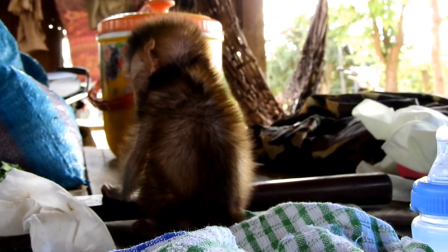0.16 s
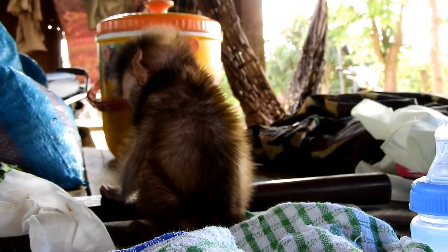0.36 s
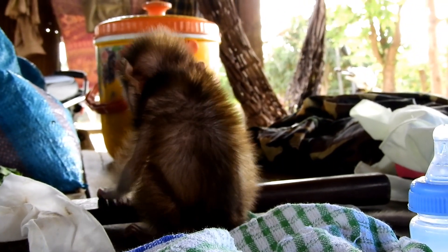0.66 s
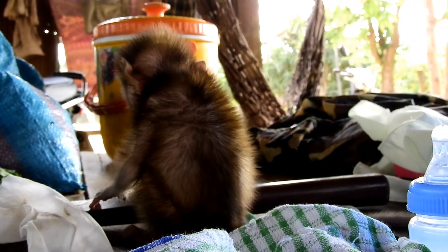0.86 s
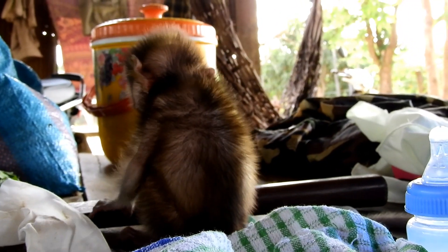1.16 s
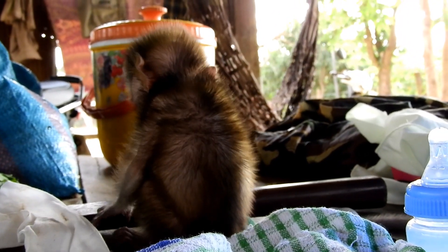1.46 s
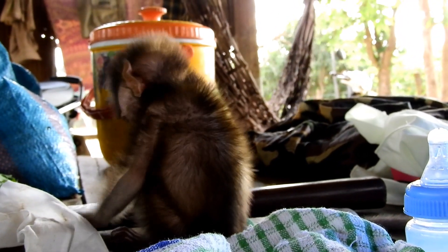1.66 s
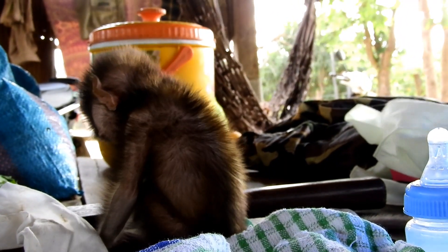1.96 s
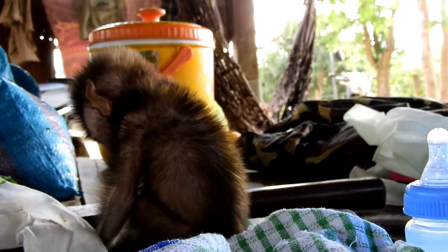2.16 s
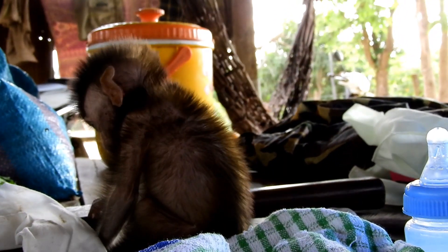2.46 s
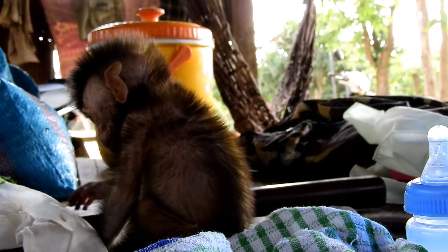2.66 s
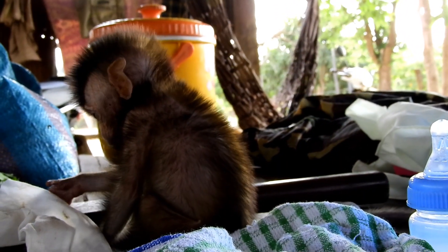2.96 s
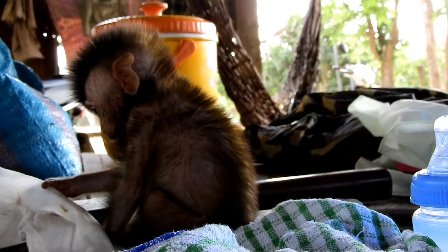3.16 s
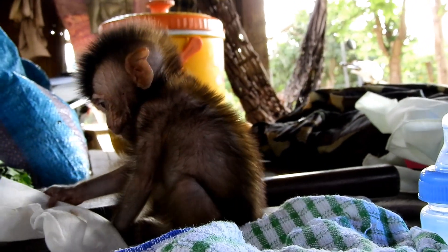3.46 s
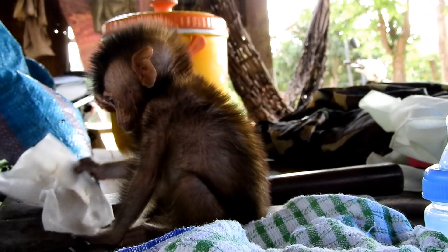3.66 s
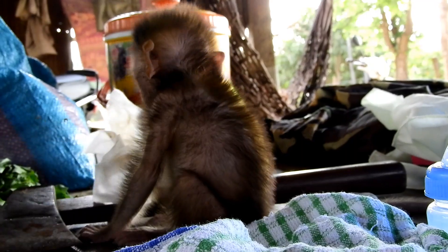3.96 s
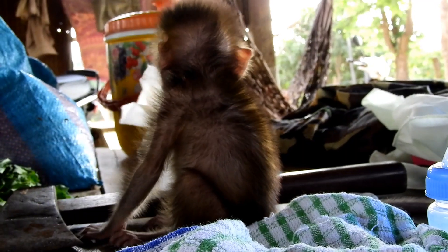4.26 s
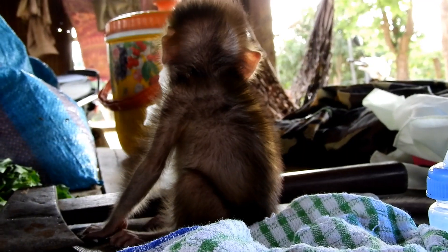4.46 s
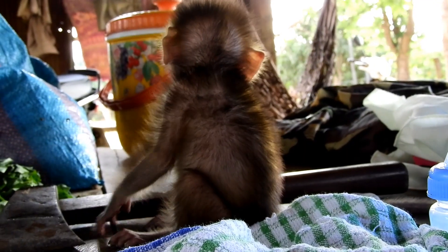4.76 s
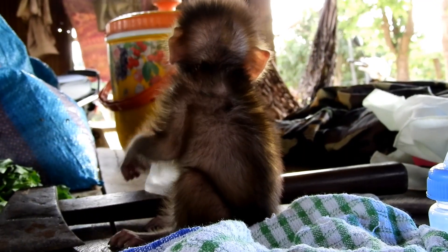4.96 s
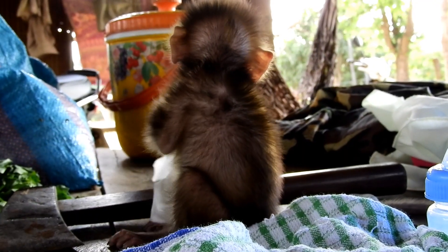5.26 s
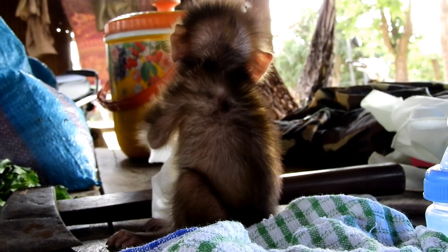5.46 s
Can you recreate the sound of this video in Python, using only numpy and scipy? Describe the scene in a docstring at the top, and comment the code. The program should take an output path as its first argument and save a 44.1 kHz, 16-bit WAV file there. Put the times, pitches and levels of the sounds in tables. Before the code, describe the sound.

In an open village shelter, many chicks give short, high, falling peeps over a low throbbing small engine and soft hiss. A young monkey rustles bags and cloth, scrapes and bumps boards, busiest near four seconds. A hen clucks once midway. The scene is only in the right channel; the left holds faint flickering hiss.

```python
"""Open shelter by a yard: a young monkey shuffles on cloth and plastic bags, rubbing, bumping and scraping.
Chicks peep as gliding near-sines, a hen clucks once and something coos far off, both as pulses through
resonances. A small engine throbs as tones locked to its firing, over air hiss made of coloured noise.
Only the right microphone port hears the scene; the left carries its own faint flickering hiss."""
import sys
import numpy as np
from scipy import signal
from scipy.fft import rfft, irfft
from scipy.io import wavfile
from scipy.ndimage import uniform_filter1d

SR = 44100
rng = np.random.default_rng(int(sys.argv[2]) if len(sys.argv) > 2 else 0)


def master(y):
    """Save y as 16-bit WAV."""
    cut = np.clip(np.atleast_2d(y).T, -1, 1)
    pcm = np.round(cut * 32767)  # scale
    wavfile.write(sys.argv[1], SR, pcm.astype(np.int16))


def how_loud(loudness_db):
    """Turn decibels into a plain amplitude multiplier (0 dB gives 1, 20 dB gives 10)."""
    steps = np.asarray(loudness_db, float) / 20
    return 10 ** steps


N = 246959

# Scene levels are ahead of the right channel gain; spectra give shape only.
# Left port self-noise: (frequency [Hz], relative density [dB/Hz])
LEFT_HISS_SPECTRUM = [(30, -7), (100, -5.5), (150, 3.5), (200, 5), (300, -2), (1000, -4.5), (2500, -11.5),
                      (4500, -6.5), (8000, -12), (12000, -16), (14400, -19)]
# Air spectrum: (frequency [Hz], relative density [dB/Hz])
AIR_SPECTRUM = [(25, -28.5), (63, -19.5), (111, -22), (150, 2.5), (221, -7), (273, -15), (560, -21),
                (2480, -27), (3890, -26.5), (4450, -23.5), (5960, -24.5), (9120, -23), (11900, -37.5)]
# Air level: (time [s], level [dB])
AIR_LEVEL_DB = [(0, -48), (1.5, -48), (3.5, -49.5), (5.6, -53)]
# Engine tones: (multiple of firing rate [1], relative level [dB])
ENGINE_ORDERS = [(5, -8), (6, 3.5), (7, -3), (8, -17), (9, -7), (10, -5.5)]
# Engine level: (time [s], level [dB])
ENGINE_LEVEL_DB = [(0, -48), (1.6, -46.5), (2.4, -47.5), (3, -52.5), (3.6, -49), (5.5, -51.5)]
# Far coo: (time [s], pitch [Hz], level [dB])
COO_TRACK = [(3.14, 255, -63), (3.2, 247, -61.5), (3.52, 258.6, -54.5), (3.58, 250, -54.5),
             (3.63, 247, -69)]
# Coo throat resonances: (frequency [Hz], width per pass [Hz], relative level [dB])
COO_RESONANCES = [(260, 150, -5), (505, 120, 0)]
# Hen cluck: (time [s], pitch [Hz], level [dB], beak opening factor on resonances [1])
CLUCK_TRACK = [(3.232, 196, -66, .93), (3.25, 200, -52, .93), (3.295, 213, -44.5, .99),
               (3.32, 212, -44, 1.11), (3.372, 220, -60, 1.14)]
# Hen resonances at opening 1: (frequency [Hz], width per pass [Hz], relative level [dB])
BEAK_RESONANCES = [(430, 150, -6), (880, 220, 0), (1130, 200, -5)]
# Short peeps: (start [s], length [s], start pitch [Hz], end pitch [Hz], level before reach [dB])
PEEP_GLIDES = [(.16, .09, 4990, 3300, -57), (.278, .045, 4650, 4100, -59), (.36, .042, 5050, 4100, -56),
               (.477, .045, 4650, 4400, -57), (.535, .143, 5000, 3100, -54), (.715, .055, 4650, 4150, -59),
               (.813, .09, 5350, 4400, -55), (.925, .08, 4480, 5300, -48), (1.17, .03, 3950, 3870, -52),
               (1.53, .13, 4500, 3300, -58), (1.93, .035, 4500, 3950, -53), (2.035, .07, 4650, 4350, -56),
               (2.16, .05, 4300, 3500, -60), (1.135, .04, 4500, 4380, -55), (2.7, .09, 4400, 3300, -60),
               (2.83, .025, 5000, 5400, -55), (2.9, .08, 4750, 5750, -52), (2.974, .036, 3700, 3400, -56),
               (3.069, .09, 4600, 3500, -58), (3.968, .04, 5400, 5100, -55), (4.13, .016, 4100, 5000, -55),
               (4.303, .058, 4800, 3350, -55), (4.47, .072, 4950, 3400, -54), (4.5, .05, 5100, 4250, -52),
               (4.66, .09, 4700, 3850, -58), (4.944, .106, 5580, 3400, -56), (5.13, .1, 5050, 3550, -60),
               (5.16, .05, 4950, 4400, -57), (5.34, .06, 4500, 3500, -60)]
# Cries held near their first pitch, then gliding evenly, mostly down:
# (start [s], length [s], first pitch [Hz], end pitch [Hz], level before reach [dB])
CRY_GLIDES = [(0, .13, 5700, 3400, -60), (.29, .14, 5650, 3700, -58), (1.325, .155, 5800, 4200, -55),
              (1.685, .15, 5750, 4100, -58), (2.14, .07, 5680, 5800, -59), (2.222, .06, 4800, 4250, -54),
              (3.487, .048, 4520, 4200, -55), (3.62, .048, 4930, 4250, -55), (2.612, .185, 5730, 4100, -57),
              (3.63, .07, 5780, 5100, -60), (4.137, .068, 5030, 4250, -52), (4.856, .105, 5560, 4050, -58),
              (5.36, .06, 5480, 4550, -54)]
# Tweets arching up and down: (start [s], top pitch [Hz], level before reach [dB])
TWEET_ARCHES = [(.996, 5590, -46.5), (4.43, 6800, -57), (4.776, 6760, -57), (4.96, 6510, -54),
                (5.116, 6820, -56.5)]
# How well each pitch carries: (pitch [Hz], gain [dB])
REACH_GAIN = [(3000, -6), (3500, -1), (3900, -5), (4350, 1), (4900, 0), (5250, -4), (5700, -2), (7000, -2)]
# Nails scraping a hard edge: (loudest [s], length [s], resonance [Hz], width per pass [Hz], level [dB])
NAIL_SCRAPES = [(1.947, 0.12, 2090, 692, -48), (3.874, 0.074, 1750, 298, -50.5)]
# Hands and feet bumping boards: (time [s], blow level [dB], drag decay [s], pitch factor of spot [1])
BOARD_BUMPS = [(0.674, -42.5, 0.017, 1.3), (0.718, -42.5, 0.028, 1.35), (1.929, -48.5, 0.13, 1.54),
               (3.725, -42.5, 0.05, 0.57), (3.839, -39.5, 0.066, 0.8), (3.971, -50, 0.015, 1.1),
               (4.742, -44.5, 0.042, 1.05)]
# Board modes at pitch factor 1: (frequency [Hz], relative level [dB], t60 [s])
BOARD_MODES = [(190, -3, .06), (300, -1, .07), (370, -2, .07), (450, 0, .08), (545, -3, .07),
               (700, -8, .06)]
# Constant fidgeting under the strokes: (time [s], crisp rustle level [dB])
FIDGET_LEVEL_DB = [(0, -54.5), (.8, -57), (1.5, -58.5), (2.4, -54.5), (3.5, -57.5), (4.1, -58), (5.5, -60)]
# Strokes of fur, cloth and bags: (loudest [s], length [s], crisp level [dB], dull drag re crisp [dB])
RUB_STROKES = [(0.388, 0.062, -50.5, -5.5), (0.742, 0.051, -50.5, 0), (.908, .03, -43, -22),
               (0.986, 0.13, -45, -13), (1.154, 0.25, -47.5, -10.5), (1.561, 0.026, -52, -5.5),
               (1.71, 0.091, -51, -9.5), (1.819, 0.11, -45.5, -12.5), (1.944, 0.083, -49.5, 1.5),
               (2.054, 0.019, -48, -17), (2.783, 0.18, -50, -7), (3.095, 0.19, -50, -9),
               (3.215, 0.14, -51, -7.5), (3.328, 0.085, -49.5, -6.5), (3.549, 0.085, -50.5, -7),
               (3.746, 0.14, -48.5, -14), (3.861, 0.086, -43, -5), (3.902, 0.039, -42, -3.5),
               (3.948, 0.052, -57, 9), (4.771, 0.081, -50, -6)]
# Bright rustle spectrum: (frequency [Hz], relative level [dB])
CRISP_SPECTRUM = [(4500, -14.5), (6500, -9), (8900, 2), (10500, -10), (12200, -15)]
# Middle of the rustle: (frequency [Hz], relative level [dB])
SWISH_SPECTRUM = [(2000, -11.5), (2600, -4.5), (4500, -0.5), (6500, -5), (8500, -47.5)]
# Dull drag spectrum: (frequency [Hz], relative level [dB])
DULL_SPECTRUM = [(200, -44), (400, -8), (1200, 4), (2300, 0.5), (3000, -20.5), (5000, -70.5)]

LEFT_HISS_DB, RIGHT_GAIN_DB = -57, 6.5
RIGHT_BAND_HZ = 28, 12350  # steep edges
FADE_S = 5.462, 5.492  # fade start, end
FIRING_HZ = 22.05
CROWD_DB, CROWD_SPREAD_DB = -73, 6.5  # faint chicks farther off
# Glide exponents: falls (length / STRAIGHT_S) ** LINGER, so longer ones stay on top; rises steepen by RISE_BEND
STRAIGHT_S, LINGER, RISE_BEND = .05, .62, 2.7
CRY_HOLD_S, RISE_GROW_DB = .028, 15  # time on first pitch; growth over a rise of more than 5 %
TWEET_S, ARCH = .05, .04  # length; share of pitch that the ends lie under the top
TREMBLE = .008  # rms share of pitch
NEAR_ECHO_DB, NEAR_ECHO_T60_S = -7, .04  # posts and walls close to the chicks
FAR_ECHO_DB, FAR_ECHO_T60_S = -4.5, .25
ROUGHEN_HZ = 250  # fast random level changes roughen the far echoes
RISE_SHARE, EDGE_DB = .3, -11  # rise time re stroke length; level one rise before or one length after the peak
FIDGET_DULL_DB = -10  # dull drag re crisp
SWISH_DB, SWISH_SHARE = -5, .4  # swish gain; share of the dull drag's dB that it follows


def evened(x):
    """Scales to rms 1."""
    return x / np.sqrt(np.mean(x ** 2) + 1e-20)


def curve(rows):
    """Interpolates the columns of a time table, one value a sample."""
    s, *columns = np.transpose(rows)
    return [np.interp(np.arange(N) / SR, s, column) for column in columns]


def wander(hz):
    """Random signal of rms 1, rolled off above hz."""
    spectrum = rfft(rng.standard_normal(N))
    rolloff = 1 + (np.fft.rfftfreq(N, 1 / SR) / hz) ** 4
    return evened(irfft(spectrum / rolloff, N))


def colour(x, points):
    """Filters x by a spectrum on a log-frequency axis, to rms 1."""
    f, db = np.transpose(points)
    hz = np.fft.rfftfreq(N, 1 / SR)
    gain = how_loud(np.interp(np.log(hz + 1), np.log(f + 1), db))
    return evened(irfft(rfft(x) * gain, N))


def resonate(x, hz, width_hz):
    """Movable resonance of gain 1: shift down, smooth, shift back."""
    turn = np.exp(2j * np.pi * np.cumsum(hz * np.ones(len(x))) / SR)
    r = np.exp(-np.pi * width_hz / SR)
    return 2 * (turn * signal.lfilter([1 - r], [1, -r], x / turn)).real


def crackle(per_s, spread_db, smooth):
    """Dense tiny snaps of uneven size, blended with smooth noise."""
    happens = rng.random(N) < per_s / SR
    size = how_loud(spread_db * np.minimum(rng.exponential(1, N), 4)) * happens
    return smooth * rng.standard_normal(N) + evened(size * rng.standard_normal(N))


def patchy(x, patchy_db):
    """Uneven gain in patches some hundred hertz wide and tens of milliseconds long."""
    z = signal.stft(x, nperseg=512, noverlap=384)[2]
    field = rng.standard_normal(z.shape[::-1]).T
    field = uniform_filter1d(field, size=2, axis=0)  # frequency
    field = uniform_filter1d(field, size=12, axis=1)  # time
    return signal.istft(z * how_loud(patchy_db * evened(field)), nperseg=512, noverlap=384)[1][:N]


def yard(x, wet_db, t60_s=0.014, gap_s=0.011):
    """Direct sound plus a decaying cloud of sparse reflections."""
    t = np.arange(SR // 2) / SR
    signs = rng.choice([-1., 1.], len(t))
    present = (rng.random(len(t)) < .05) * (t > gap_s)
    taps = signs * present * how_loud(-60 * t / t60_s)
    return x + how_loud(wet_db) * signal.oaconvolve(x, taps / np.linalg.norm(taps))[:N]


def left_hiss():
    """Left port self-noise: coloured noise with a flickering, patchy level."""
    hiss = how_loud(LEFT_HISS_DB + 1.6 * wander(23)) * colour(rng.standard_normal(N), LEFT_HISS_SPECTRUM)
    return patchy(hiss, patchy_db=5.0)


def air():
    """Hiss of the surroundings: coloured noise, breathing slightly."""
    level_db = curve(AIR_LEVEL_DB)[0] + 0.21 * wander(26.3)
    return how_loud(level_db) * colour(rng.standard_normal(N), AIR_SPECTRUM)


def engine():
    """Multiples of the firing rate nearly aligned at each firing, so the hum throbs."""
    turns = np.cumsum(FIRING_HZ * (1 + 0.00427 * wander(4.83))) / SR + .86
    tones = np.zeros(N)
    for k, db in ENGINE_ORDERS:
        drift_rad = .22 * wander(3)
        phase = 2 * np.pi * k * turns + drift_rad + 0.059 * k * k
        tones += how_loud(db + 1.2 * wander(1.4)) * np.cos(phase)
    return how_loud(curve(ENGINE_LEVEL_DB)[0]) * evened(tones)


def voice(rows, throat, rough):
    """Jittered pulses and puffs of breath through throat resonances."""
    hz, level_db, *opening = curve(rows)
    opening = opening[0] if opening else 1
    level_db = level_db + 2.5 * wander(25)  # the voice breaks up
    turns = np.cumsum(hz * (1 + 0.014 * wander(99))) / SR
    folds = sum(np.cos(2 * np.pi * k * turns) for k in range(1, 6))
    breath = np.exp(-(turns % 1) / 0.3) * rng.standard_normal(N)
    drive = evened(folds) + rough * breath
    sound = np.zeros(N)
    for hz_rest, width_hz, db in throat:
        f = hz_rest * opening
        sound += how_loud(db) * resonate(resonate(drive, f, width_hz), f, width_hz)
    t = np.arange(N) / SR
    sounding = (t > rows[0][0]) * (t < rows[-1][0])
    return yard(how_loud(level_db) * sounding * evened(sound), wet_db=-5)


def coo():
    """Far coo: voiced pulses with less breath than the cluck, through two resonances."""
    return voice(COO_TRACK, COO_RESONANCES, rough=1.2)


def cluck():
    """Hen cluck: breathy pulses; the opening beak lifts the resonances."""
    return voice(CLUCK_TRACK, BEAK_RESONANCES, rough=6)


def chick_calls():
    """Pitch glides (start [s], pitch track [Hz], level [dB]); a faint crowd falls in at random."""
    def unit(length_s):
        return np.linspace(0, 1, round(length_s * SR))

    crowd = [(5.4 * a, .04 + .06 * b, 4100 + 1300 * c, 3400 + 1300 * c, CROWD_DB + CROWD_SPREAD_DB * d)
             for a, b, c, d in rng.random((220, 4))]
    calls = []
    for s, length, start, end, db in PEEP_GLIDES + crowd:
        bend = RISE_BEND if end > start else (length / STRAIGHT_S) ** LINGER
        calls.append((s, start + (end - start) * unit(length) ** bend, db))
    for s, length, first, end, db in CRY_GLIDES:
        calls.append((s, np.interp(length * unit(length), [CRY_HOLD_S, length], [first, end]), db))
    for s, top, db in TWEET_ARCHES:
        calls.append((s, top * (1 - ARCH * (2 * unit(TWEET_S) - 1) ** 2), db))
    return calls


def peeps():
    """Near-sine glides with trembling pitch and fluttering level, plus near and far echoes."""
    out = np.zeros(N + SR)
    flutter, tremble = np.tile(wander(120), 2), np.tile(wander(170), 2)
    for s, hz, db in chick_calls():
        at, count = round(s * SR), len(hz)
        glide_hz = hz * (1 + TREMBLE * tremble[at:at + count])
        rises = hz[-1] > 1.05 * hz[0]
        grow_db = RISE_GROW_DB * np.linspace(-.5, .5, count) * rises
        reach_db = np.interp(hz, *np.transpose(REACH_GAIN))
        level_db = db + grow_db + reach_db + 3.2 * flutter[at:at + count]
        tone = np.sqrt(2) * np.sin(2 * np.pi * np.cumsum(glide_hz) / SR)
        out[at:at + count] += signal.windows.tukey(count, .25) * how_loud(level_db) * tone
    near = yard(out[:N], NEAR_ECHO_DB, NEAR_ECHO_T60_S, gap_s=.002)
    far = yard(near, FAR_ECHO_DB, FAR_ECHO_T60_S, gap_s=.015) - near
    return near + far * wander(ROUGHEN_HZ)


def scrapes():
    """Nails on a hard edge: swelling noise rings one broad resonance."""
    t, out = np.arange(N) / SR, np.zeros(N)
    for s, length, hz, width_hz, db in NAIL_SCRAPES:
        swell = np.cos(np.pi * np.clip((t - s) / length, -.5, .5))
        noise = crackle(1500, 1.9, 0.77)
        out += how_loud(db) * swell * evened(resonate(resonate(noise, hz, width_hz), hz, width_hz))
    return out


def bumps():
    """A blow and short drag of noise ring board modes; stiffer spots ring higher and shorter."""
    t, ring_t, out = np.arange(SR // 2) / SR, np.arange(SR // 4) / SR, np.zeros(N + SR)
    for s, blow_db, drag_s, spot in BOARD_BUMPS:
        modes = np.zeros(len(ring_t))
        for hz, db, t60_s in BOARD_MODES:
            decay = how_loud(db - 60 * np.sqrt(spot) * ring_t / t60_s)
            modes += decay * np.sin(2 * np.pi * hz * spot * ring_t)
        push = how_loud(blow_db) * np.exp(-t / drag_s) * rng.standard_normal(len(t))
        sound = signal.oaconvolve(push, modes / np.linalg.norm(modes))
        at = round(s * SR)
        out[at:at + len(sound)] += sound
    no_bass = signal.butter(3, 130, "highpass", fs=SR, output="sos")  # the bumps carry no deep bass
    return signal.sosfilt(no_bass, out[:N])


def rubbing():
    """Bags crackle bright, fur and cloth drag dull on boards; strokes swell fast and die slower."""
    t, bed = np.arange(N) / SR, how_loud(curve(FIDGET_LEVEL_DB)[0]) ** 2
    # summed powers of the three layers
    crisp_power = bed
    dull_power = bed * how_loud(FIDGET_DULL_DB) ** 2
    swish_power = bed * how_loud(SWISH_SHARE * FIDGET_DULL_DB) ** 2
    for s, length, db, dull_db in RUB_STROKES:
        away = np.maximum((s - t) / RISE_SHARE, t - s) / length
        power = how_loud(db + EDGE_DB * away) ** 2
        crisp_power = crisp_power + power
        dull_power = dull_power + power * how_loud(dull_db) ** 2
        swish_power = swish_power + power * how_loud(SWISH_SHARE * dull_db) ** 2
    snaps = crackle(5000, 1.5, 1.0)
    crisp = np.sqrt(crisp_power) * colour(snaps, CRISP_SPECTRUM)
    swish = how_loud(SWISH_DB) * np.sqrt(swish_power) * colour(snaps, SWISH_SPECTRUM)
    rustle = (crisp + swish) * how_loud(1.7 * wander(25))
    drag = np.sqrt(dull_power) * colour(crackle(1500, 2, .8), DULL_SPECTRUM)
    return rustle + drag * how_loud(0.31 * wander(30))


def scene():
    """All sources on the right; the left port stays deaf to them."""
    noises = patchy(air() + rubbing() + scrapes(), patchy_db=2.5)
    calls = peeps() + cluck() + coo()
    return np.array([np.zeros(N), engine() + noises + bumps() + calls])


def low_pass(x):
    """Removes everything above the highest recorded frequency."""
    return signal.sosfilt(signal.butter(12, 14470, fs=SR, output="sos"), x)


def record(dry):
    """Right channel gain and steep band edges, self-noise on the left, closing fade."""
    band = signal.ellip(6, .5, 70, RIGHT_BAND_HZ, "bandpass", fs=SR, output="sos")
    heard = how_loud(RIGHT_GAIN_DB) * signal.sosfilt(band, dry)
    noise = np.array([left_hiss(), np.zeros(N)])
    fade = np.interp(np.arange(N) / SR, FADE_S, [1, 0]) ** 2
    return low_pass((heard + noise) * fade)


dry = scene()
out = record(dry)
master(out)
```